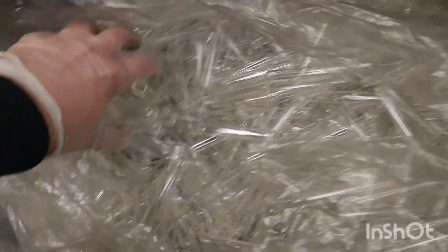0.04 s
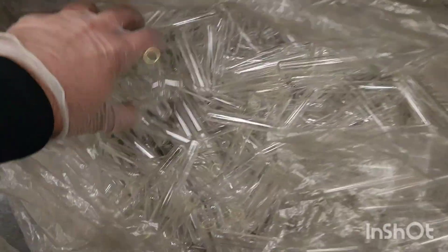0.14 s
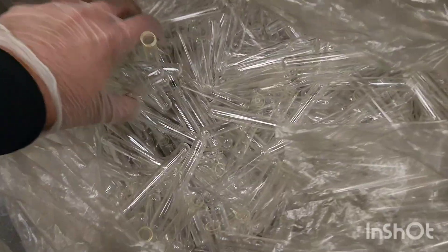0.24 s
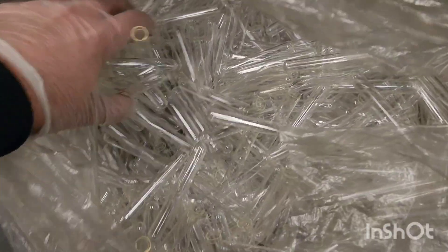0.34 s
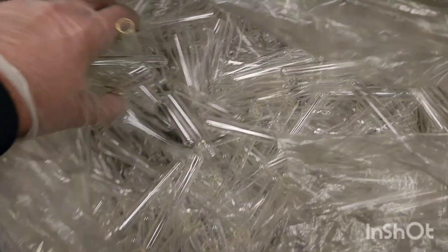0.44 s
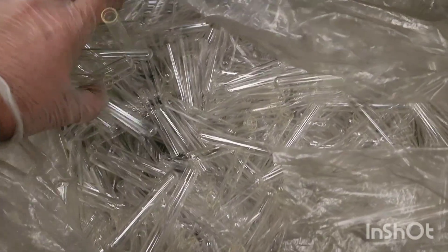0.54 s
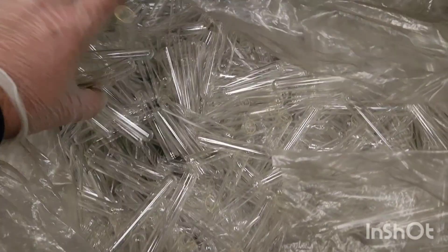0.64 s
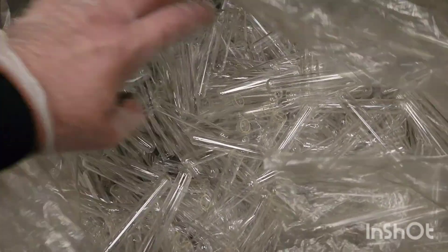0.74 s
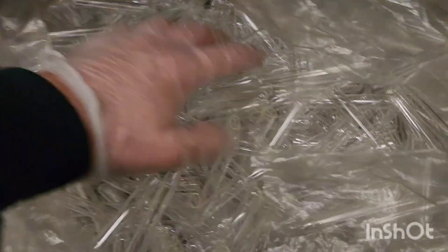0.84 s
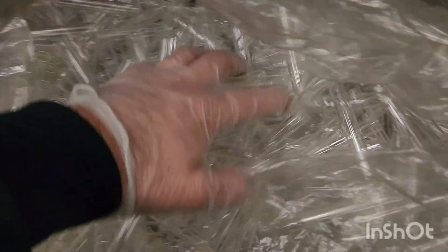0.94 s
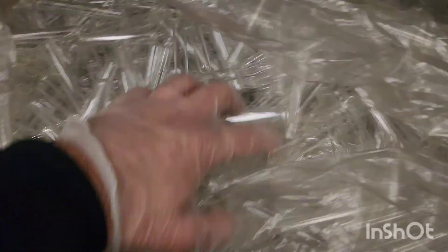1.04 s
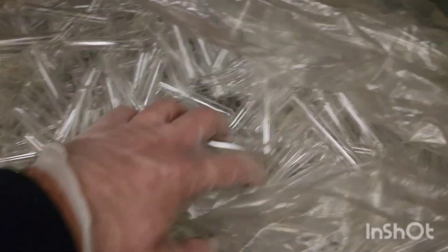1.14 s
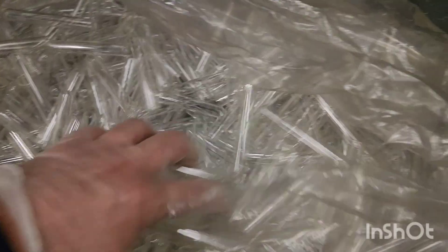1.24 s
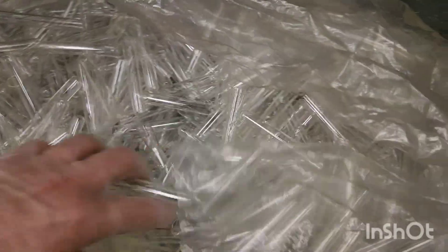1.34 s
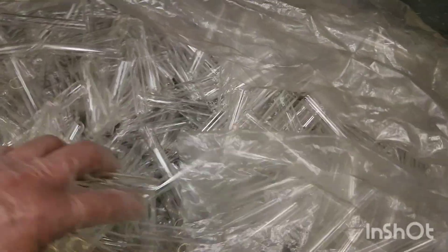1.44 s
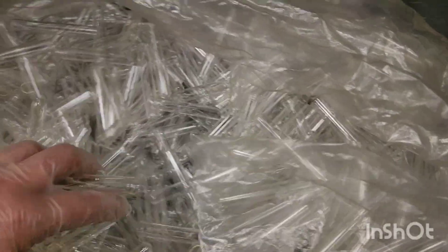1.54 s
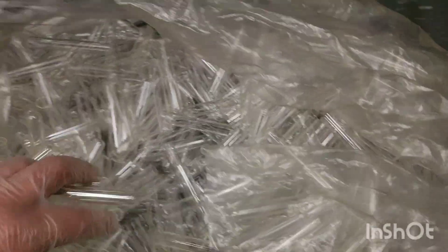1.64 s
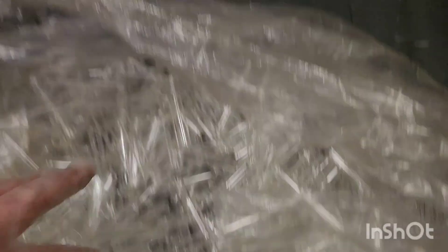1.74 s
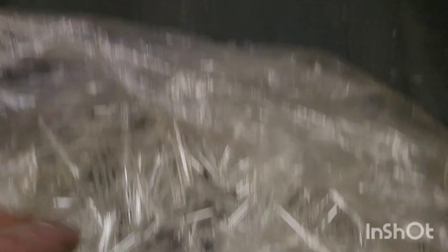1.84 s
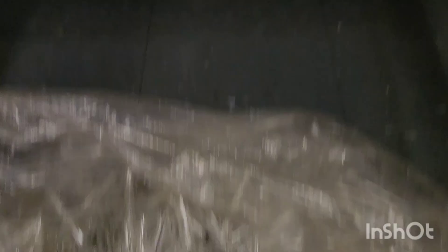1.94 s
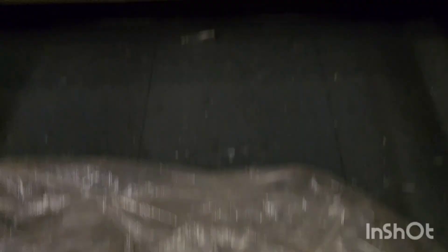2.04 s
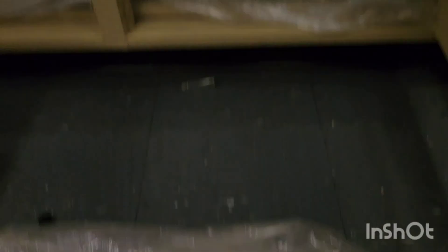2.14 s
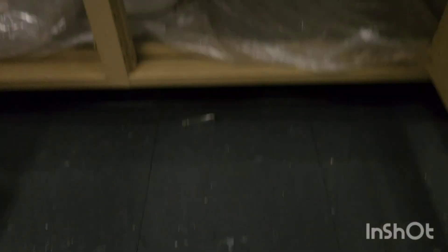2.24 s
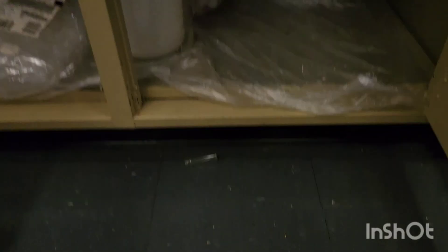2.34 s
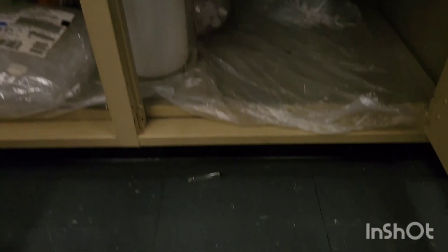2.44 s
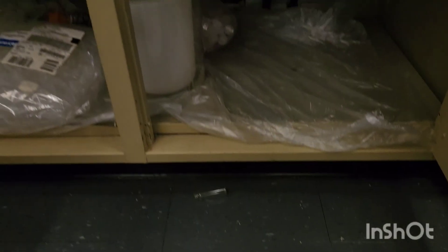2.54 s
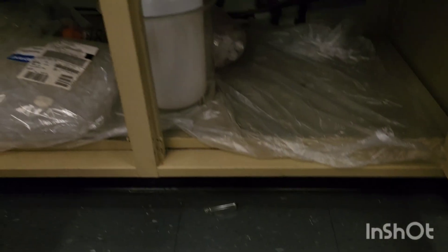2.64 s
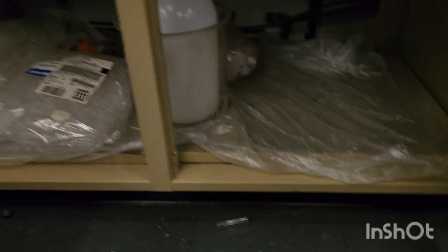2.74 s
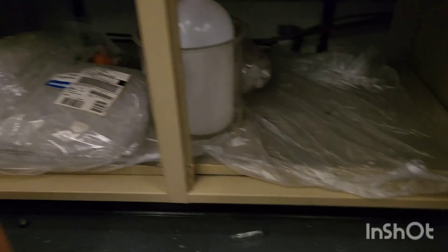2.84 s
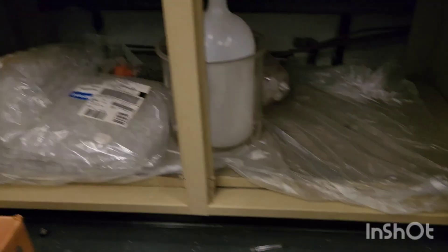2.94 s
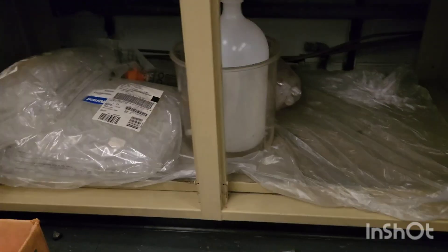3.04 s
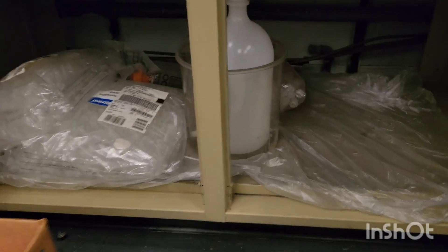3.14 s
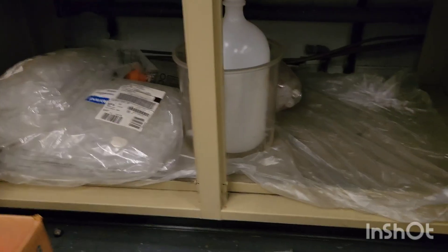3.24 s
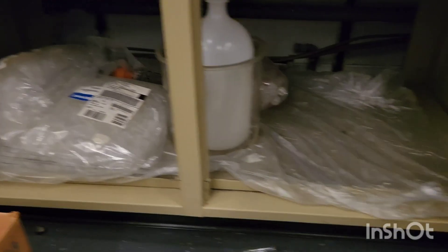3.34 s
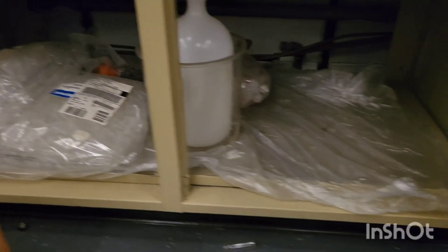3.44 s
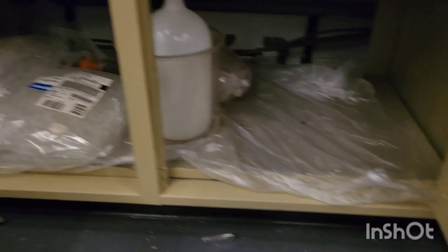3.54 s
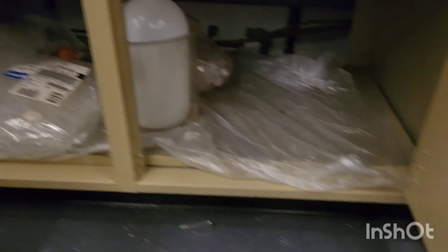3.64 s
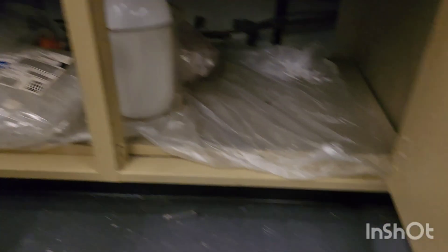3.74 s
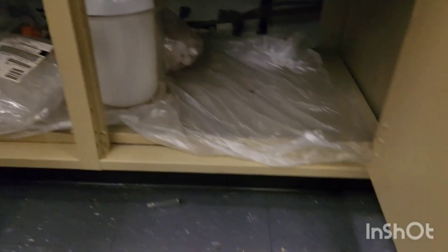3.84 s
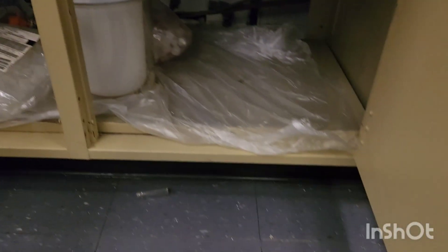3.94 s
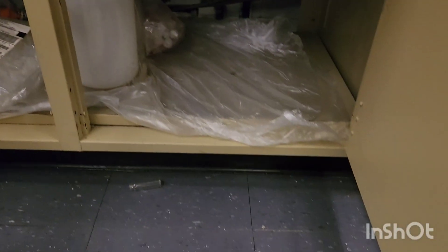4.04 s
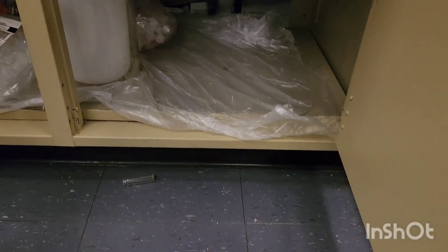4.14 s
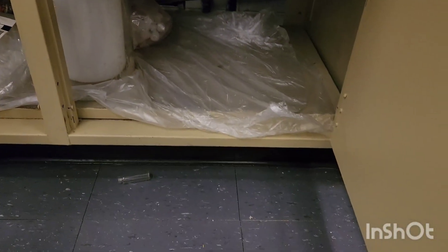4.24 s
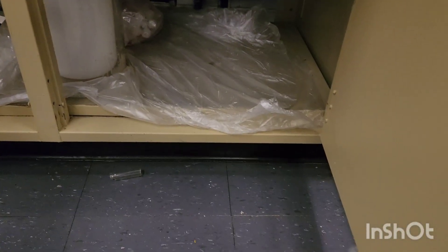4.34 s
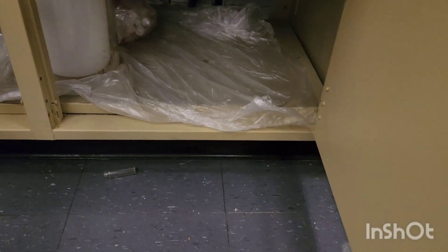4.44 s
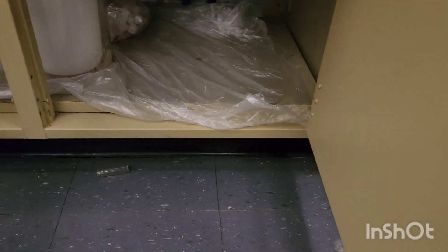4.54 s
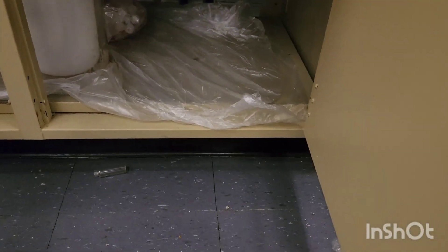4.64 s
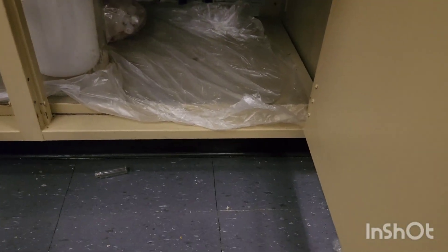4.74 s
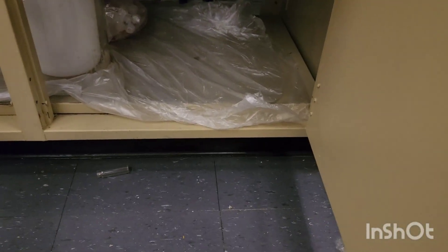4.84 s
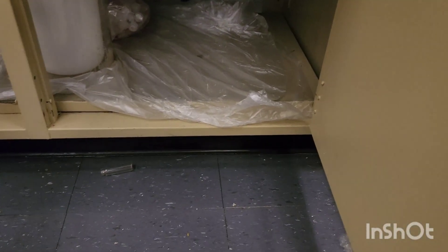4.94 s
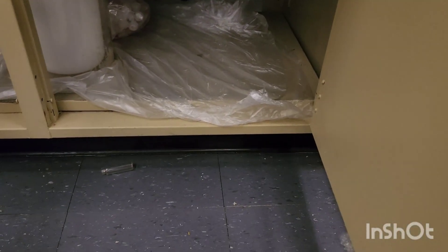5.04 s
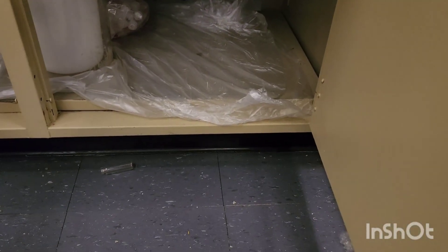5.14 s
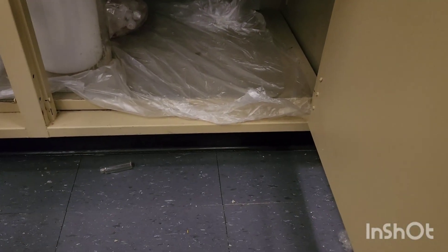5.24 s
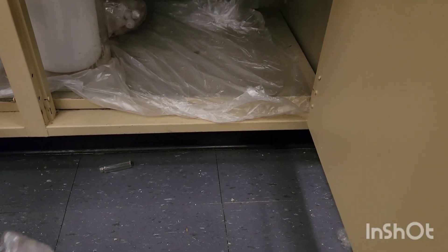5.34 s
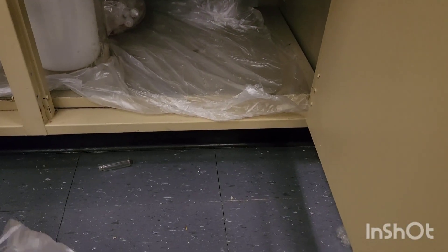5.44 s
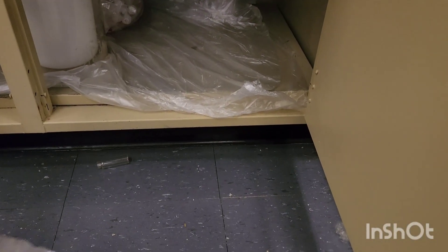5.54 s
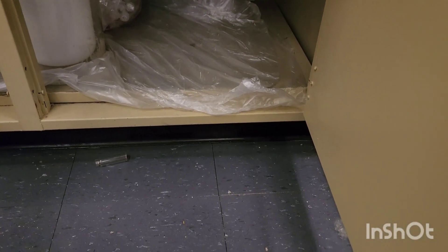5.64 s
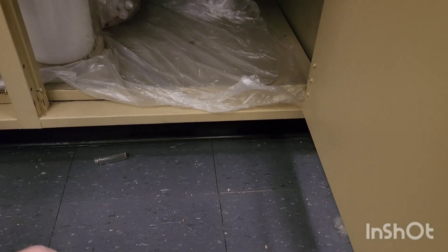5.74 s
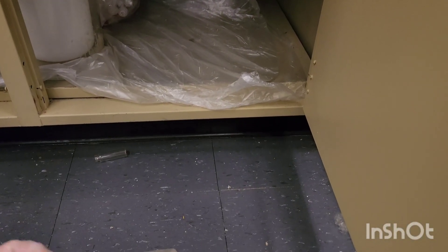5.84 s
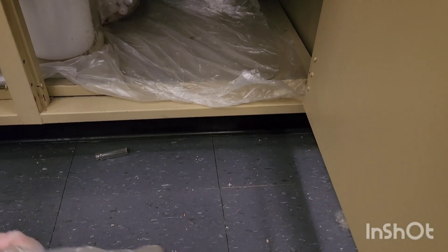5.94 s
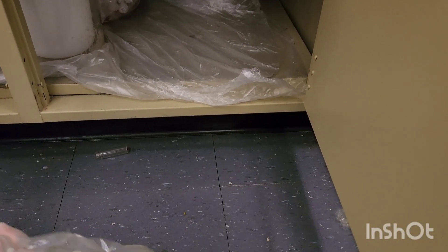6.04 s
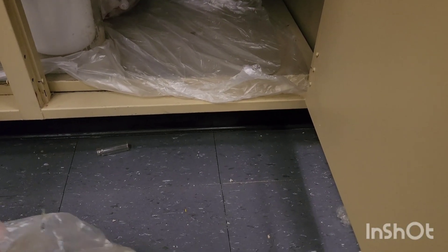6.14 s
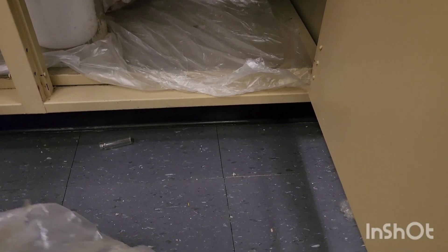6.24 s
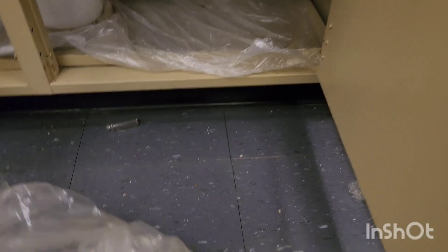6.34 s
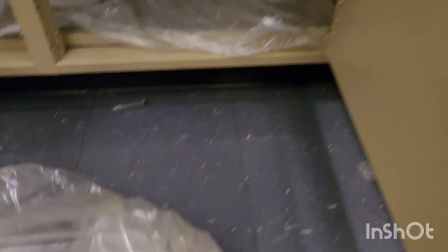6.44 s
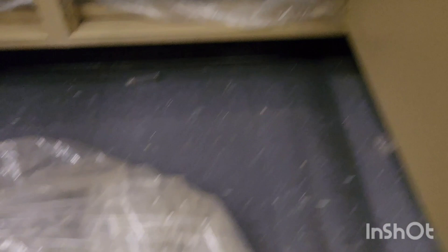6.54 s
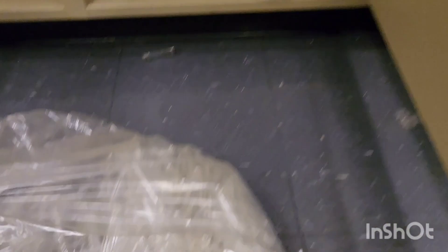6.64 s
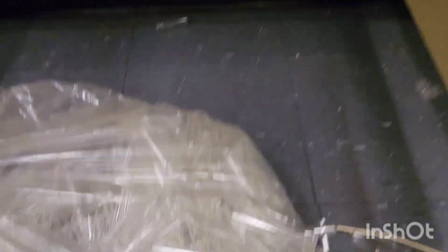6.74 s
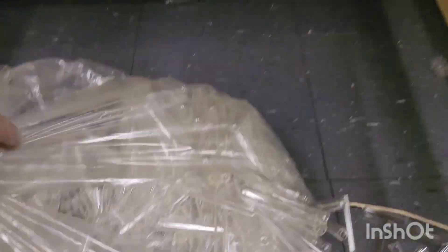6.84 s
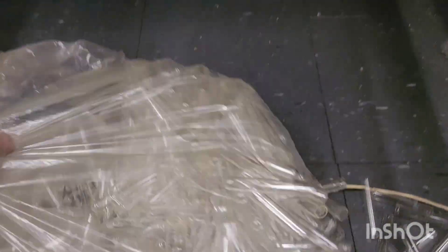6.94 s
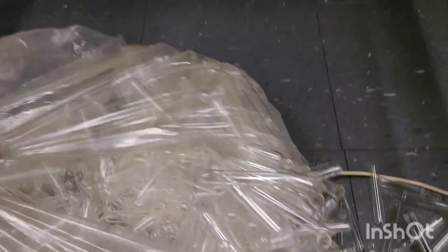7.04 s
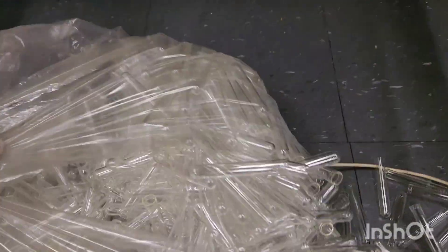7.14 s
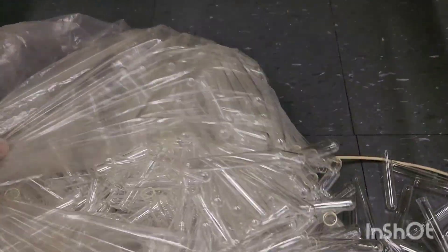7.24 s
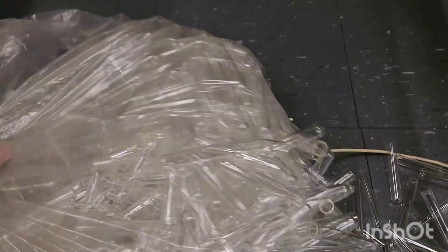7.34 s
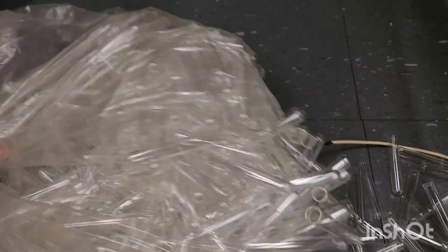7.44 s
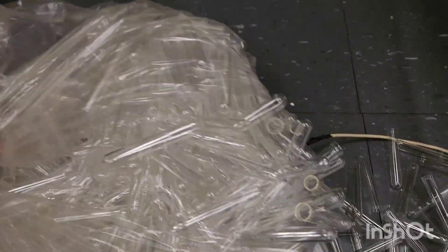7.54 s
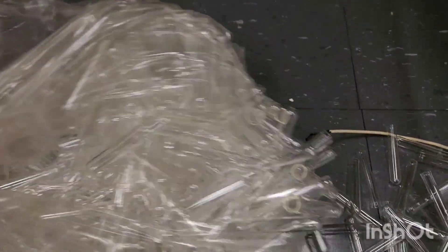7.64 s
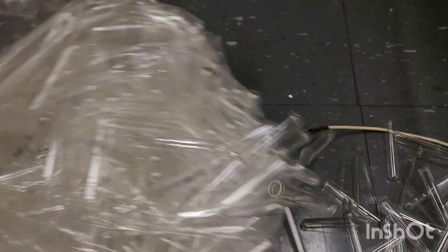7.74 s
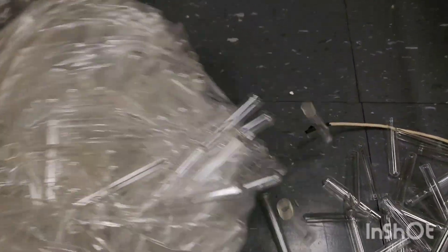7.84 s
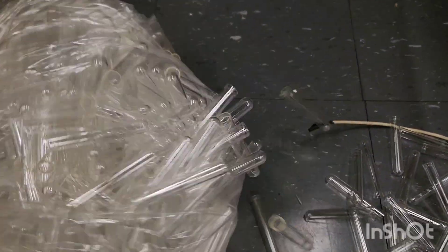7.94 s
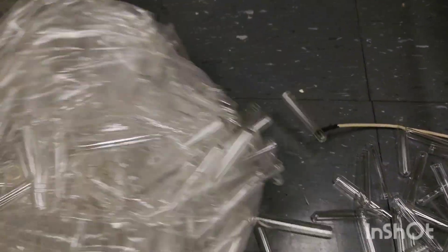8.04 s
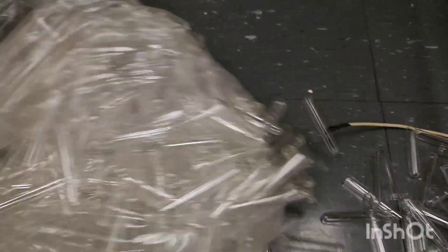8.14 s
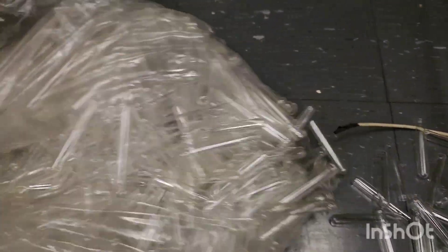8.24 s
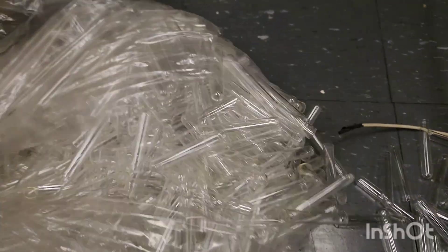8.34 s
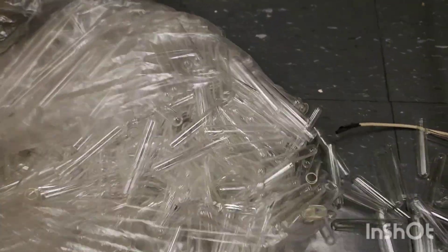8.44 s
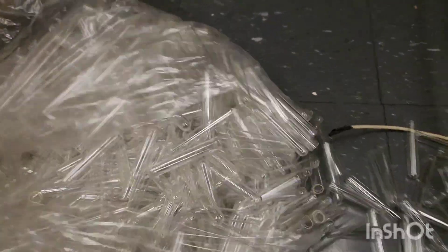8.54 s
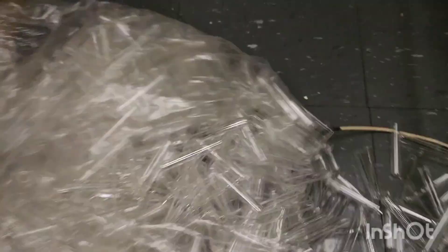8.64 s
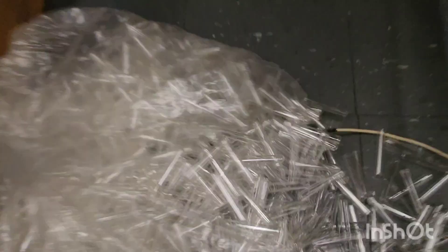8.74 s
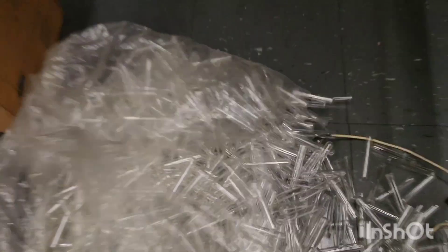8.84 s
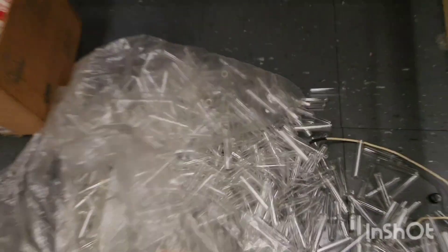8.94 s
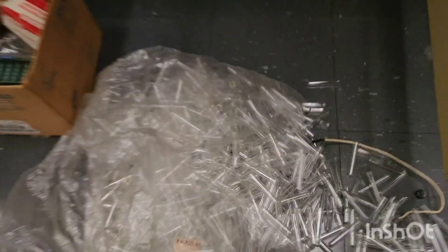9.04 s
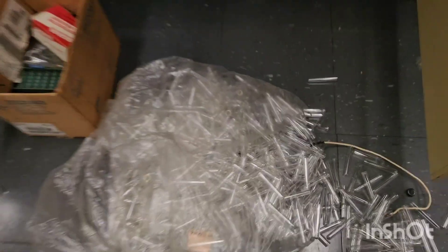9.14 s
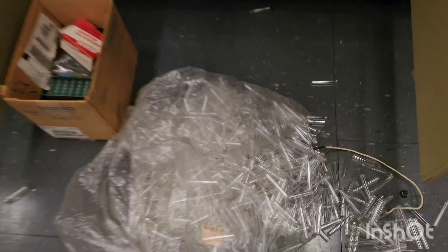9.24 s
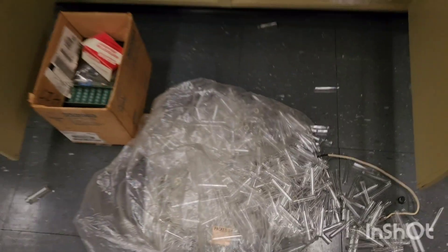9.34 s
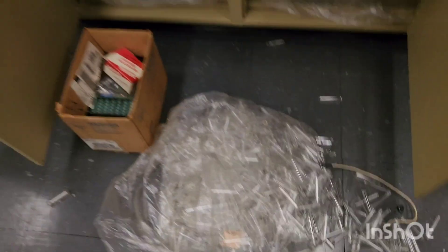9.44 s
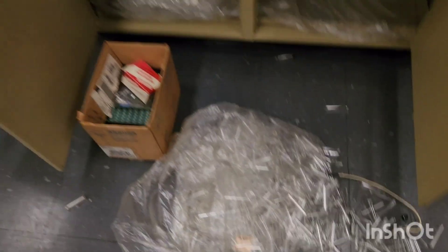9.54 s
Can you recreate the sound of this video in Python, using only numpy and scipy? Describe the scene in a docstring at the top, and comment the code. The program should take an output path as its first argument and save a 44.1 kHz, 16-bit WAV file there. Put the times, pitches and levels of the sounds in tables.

```python
"""In a small room, a hand stirs glass test tubes in a plastic bag, rests, then drags the bag over the floor.
Each impact excites a tube's damped normal modes; all are of one size, so they ring near the same pitches.
The film crinkles as its creases snap, and the heavy bag rubs and bumps softly on the floor.
Fingers tick on a hand-held microphone's case, a sleeve brushes past its two ports, the building rumbles."""
import sys
import numpy as np
from scipy import signal
from scipy.fft import rfft, irfft
from scipy.io import wavfile
from scipy.ndimage import uniform_filter1d

SR = 44100
rng = np.random.default_rng(int(sys.argv[2]) if len(sys.argv) > 2 else 0)


def wav_record(signal):
    """Record a signal, one row per channel, as 16-bit PCM in the file named by sys.argv[1]."""
    frames = np.transpose(np.atleast_2d(signal))
    bounded = np.clip(frames, -1, 1)
    # unit amplitude maps onto the largest positive 16-bit level
    quanta = np.round(bounded * 32767).astype(np.int16)
    wavfile.write(sys.argv[1], SR, quanta)


N = 423360
TIME, BINS, FRAMES = np.arange(N) / SR, np.fft.rfftfreq(N, 1 / SR), np.arange(0, N / SR, .002)
OVAL_HZ, SPLIT_HZ = 4185, 6000  # a tube's strongest mode; border between its ring and its overtones
CROSSOVER = [signal.butter(4, SPLIT_HZ, kind, fs=SR, output="sos") for kind in ("low", "high")]


def amp(db):
    """Amplitude ratio of a level in decibels."""
    return 10 ** (np.asarray(db) / 20)


def unit_rms(x):
    """Normalisation to an rms of 1."""
    return x / np.sqrt(np.mean(x ** 2) + 1e-20)


def curve_at(points, hz):
    """Interpolation on a logarithmic frequency axis."""
    f, value = np.transpose(points)
    return np.interp(np.log(hz + 1), np.log(f + 1), value)


def add(mix, s, sound):
    """Superposition of a stereo sound on the mix from time s."""
    part = mix[:, max(round(s * SR), 0):][:, :sound.shape[1]]
    part += sound[:, :part.shape[1]]


def panned(db):
    """Constant-power gains for a left-minus-right level difference."""
    pair = amp(np.array([db, -db]) / 2)
    return (pair / np.sqrt(np.mean(pair ** 2, 0))).reshape(2, -1)


def colour(x, spectrum, size=1024):
    """Minimum-phase filtering: clicks take on the spectrum and keep a sharp front."""
    log_gain = np.log(amp(curve_at(spectrum, abs(np.fft.fftfreq(size, 1 / SR)))))
    taps = np.fft.ifft(np.exp(np.conj(signal.hilbert(log_gain)))).real
    return signal.oaconvolve(x, taps[None, :size // 2], axes=1)[:, :x.shape[1]]


def push_power(start, hold, swell_s, slump_db_per_s=137.5, creep_db=-16, creep_db_per_s=54.5):
    """Exponential growth (20 dB in swell_s), a hold, then two-slope decay: a quick slump, a slow creep."""
    early, late = np.maximum(start - FRAMES, 0), np.maximum(FRAMES - start - hold, 0)
    settling = amp(-slump_db_per_s * late) ** 2 + amp(creep_db - creep_db_per_s * late) ** 2
    return amp(-20 * early / swell_s) ** 2 * settling


def heap_motion(jostle_db=1.8, jostle_s=0.049):
    """Envelopes of ring, overtones and rustle: pushes add in power, and stick-slip makes all surge."""
    # stirs and tugs: t/s, hold/s, swell/s, ring level/dB, overtones re ring/dB, rustle level/dB
    pushes = [(0.0, 0.23, .05, -25.5, -7.5, -30.5), (0.373, 0.053, 0.015, -29, -5.5, -30.5),
              (0.495, 0.073, 0.087, -25, -9.5, -30), (0.722, 0.1, .12, -18.5, -8.5, -29),
              (0.909, .19, 0.033, -14.5, -4, -23.5), (1.147, 0.36, 0.041, -19.5, -3.5, -25.5),
              (1.711, .12, 0.24, -18, -9, -34.5), (2.111, 0.027, 0.025, -49, -8, -48.5),
              (2.337, 0.2, .02, -48.5, -15, -52.5), (3.714, 0.021, 0.22, -48, -2, -46),
              (3.775, .04, .035, -26.5, -8, -29.5), (3.881, .24, 0.079, -36.5, -8, -38.5),
              (4.45, 0.21, 0.25, -37.5, -1, -32.5), (4.701, 0.17, 0.042, -24.5, -10, -28),
              (4.964, 0.26, 0.056, -28, -12.5, -31.5), (5.196, 0.33, .04, -21, -15.5, -26.5),
              (5.501, .23, 0.074, -21, -8.5, -26.5), (5.776, 0.21, .06, -16, -10, -25),
              (6.006, 0.17, 0.04, -16, -8.5, -30), (6.194, 0.24, 0.03, -21, -5.5, -29),
              (6.447, .17, 0.025, -22.5, -6, -27.5), (6.679, .1, .05, -29, -3.5, -32),
              (6.85, 0.31, 0.38, -18.5, -14, -25), (7.299, 0.13, 0.16, -21, -17.5, -26.5),
              (7.503, .08, .05, -30, -7.5, -33.5), (7.677, 0.32, 0.12, -22.5, -11, -27),
              (8.026, 0.17, .05, -19, -7.5, -26), (8.239, 0.054, .03, -18.5, -12, -51),
              (8.384, 0.17, 0.064, -23, -10, -42), (8.588, 0.15, 0.16, -16, -9, -31),
              (8.807, 0.17, 0.081, -22.5, -8.5, -40), (9.098, 0.035, 0.15, -27.5, -11, -47.5)]
    power = amp([-69, -68, -67.5])[:, None] ** 2  # the heap at rest
    for start, hold, swell_s, ring_db, overtones_db, rustle_db in pushes:
        strength = amp([[ring_db], [ring_db + overtones_db], [rustle_db]])
        power = power + strength ** 2 * push_power(start, hold, swell_s)
    span = int(jostle_s * SR)
    jostle = uniform_filter1d(uniform_filter1d(rng.standard_normal(N), span), span // 2)
    surge = amp(jostle_db * unit_rms(jostle))
    return [surge * np.interp(TIME, FRAMES, np.sqrt(layer)) for layer in power]


def follow(x, envelope, span_s=0.017):
    """Amplitude modulation: a texture is levelled by its short-time power, then takes the envelope."""
    power = uniform_filter1d(x.mean(0) ** 2, int(span_s * SR))
    power = abs(uniform_filter1d(power, int(span_s * SR / 2)))
    return x / np.sqrt(power + 0.04 * power.mean()) * envelope


def building_rumble(level_db=-50, wide_hz=500):
    """Steady noise whose long waves are coherent at the two ports."""
    # rumble spectrum: f/Hz, relative level/dB
    spectrum = [(12, -43.5), (20, -6.5), (40, 3), (68, 2), (142, -8), (248, -17.5), (558, -18.5),
                (678, -20), (2670, -24.5), (4300, -23.5), (6720, -35), (10800, -46), (12100, -39),
                (16000, -44.5)]
    common, apart = rfft(rng.standard_normal((2, N)))
    side = apart * np.sqrt(BINS / (BINS + wide_hz)) * 0.65
    noise = irfft(np.array([common + side, common - side]) * amp(curve_at(spectrum, BINS)), N)
    return amp(level_db) * unit_rms(noise) * panned(-1.8)


def reflections(x, room_db=-23, heap_db=-12, heap_t60=0.035, shift_hz=6, path_sets=5):
    """Room reverberation, and scattering inside the heap along paths that change as the tubes shift."""
    # reverberation time of the room: f/Hz, T60/s
    decay_times = [(200, 0.3), (1500, 1), (4200, 0.17), (9000, 0.087), (16000, 0.45)]
    t = np.arange(SR // 2) / SR
    shape = (path_sets + 1, 2, len(t))
    echoes = rng.standard_normal(shape) * (rng.random(shape) < .08)
    hz, age, spectra = signal.stft(echoes[-1] * (t > .008), SR, nperseg=256)
    decay = amp(-60 * age / curve_at(decay_times, hz)[:, None])
    tail = signal.istft(spectra * decay, SR, nperseg=256)[1][:, :len(t)]
    out = x + signal.oaconvolve(x, amp(room_db) * tail / np.linalg.norm(tail[0]), axes=1)[:, :N]
    for k in range(path_sets):
        paths = (echoes[k] * amp(-60 * t / heap_t60) * (t > .001))[:, :SR // 10]
        paths = amp(heap_db) * paths / np.linalg.norm(paths[0])
        crossfade = np.sqrt(np.maximum(1 - abs((TIME * shift_hz - k) % path_sets - 1), 0))
        out += signal.oaconvolve(x * crossfade, paths, axes=1)[:, :N]
    return out


def microphone_ports(x, alike_hz=800):
    """Long waves reach both ports alike; each port then has its own frequency response."""
    # balance of the bag's sound: f/Hz, left-minus-right level/dB
    balance = [(100, -3), (600, 2), (1100, -4), (2200, -8.5), (4200, -12.5), (5000, -10.5), (5900, 2.5),
               (6800, 11), (8500, 14), (10000, 4.5), (11800, 8), (12800, -25), (15000, 3)]
    spectra = rfft(x)
    leak = np.pi / 4 * alike_hz ** 2 / (BINS ** 2 + alike_hz ** 2)
    blended = spectra * np.cos(leak) + spectra[::-1] * np.sin(leak)
    return irfft(blended * panned(curve_at(balance, BINS)), N)


def floor_bumps(gain_db=-1, decay_s=0.013, rise_s=0.0035, size=6000):
    """Soft impacts of the heap on the floor: a heavily damped low oscillation with a little scuff."""
    # bumps: t/s, relative peak level/dB, f/Hz
    bumps = [(3.779, -35, 72.7), (4.066, -43, 102), (4.188, -40, 140), (4.243, -34.5, 101),
             (4.577, -32, 99), (6.424, -29, 110.5), (6.456, -32, 92), (8.528, -29, 81.5), (8.548, -32, 77)]
    out, t = np.zeros((2, N)), np.arange(size) / SR
    band = signal.butter(2, [120, 800], "band", fs=SR, output="sos")
    for s, db, hz in bumps:
        scuff = unit_rms(signal.sosfilt(band, rng.standard_normal(size)))
        envelope = np.exp(-t / decay_s) * (1 - np.exp(-t / rise_s))
        thud = (2 * np.sin(2 * np.pi * hz * t) + scuff / 2) * envelope
        add(out, s, amp(db + gain_db) * thud / abs(thud).max() * panned(-6))
    return out


def finger_ticks(gain_db=3, decay_s=0.00022, skin=0.064, skin_s=0.0076, size=1500):
    """Impacts on the case by the right port: a click damped within a cycle, and brief skin friction."""
    # ticks: t/s, relative peak level/dB, f/Hz
    ticks = [(2.201, -38, 400), (2.68, -38, 600), (2.73, -41, 810), (2.908, -31, 670), (2.927, -27.5, 400),
             (2.958, -36, 1400), (2.964, -25, 1390), (2.992, -31, 400), (3.085, -29, 1400),
             (3.164, -28, 560), (3.588, -28.5, 700), (3.62, -22.5, 670), (3.767, -9, 1380),
             (4.197, -17.5, 1420), (4.25, -21, 850), (4.578, -14, 600), (4.927, -15.5, 1200),
             (6.469, -16, 600), (8.553, -13.5, 890), (9.375, -42, 890)]
    out, t = np.zeros((2, N)), np.arange(size) / SR
    band = signal.butter(2, [250, 3600], "band", fs=SR, output="sos")
    for s, db, hz in ticks:
        rub = unit_rms(signal.lfilter([1], [1, -.88], rng.standard_normal(size)))
        click = np.cos(2 * np.pi * hz * t) * np.exp(-t / decay_s)
        tick = signal.sosfilt(band, click + skin * rub * np.exp(-t / skin_s))
        add(out, s, amp(db + gain_db) * tick / abs(tick).max() * panned(-17))
    return out


def sleeve_swishes(grain_db=3):
    """Grainy friction noise of cloth passing the right port as the grip changes."""
    # swishes: t/s, duration/s, level/dB
    brushes = [(2.897, 0.12, -42.5), (3.03, 0.087, -53.5), (3.153, .03, -41), (3.189, 0.057, -45.5),
               (3.297, 0.54, -61), (4.363, .3, -43.5)]
    spectrum = [(60, 16), (300, 9.5), (1200, -4), (4500, 1.5), (7000, -0.5), (10000, -10),
                (13000, -2), (16000, -21)]  # f/Hz, relative level/dB
    out = np.zeros((2, N))
    fibres = rng.standard_normal((2, N)) * amp(grain_db * np.minimum(rng.exponential(1, N), 5))
    cloth = unit_rms(colour(fibres, spectrum))
    for s, duration, db in brushes:
        swell = signal.windows.tukey(int(duration * SR), .7)
        add(out, s, amp(db) * swell * cloth[:, int(s * SR):][:, :len(swell)] * panned(-4.2))
    return out


def bag_friction(rustle, lumpy_db=3, swell_s=0.18, rub_db=-28.5):
    """Dull, uneven friction noise whenever the heavy bag moves, stronger when it slides on the floor."""
    # slides: t/s, hold/s, level/dB
    scrapes = [(0.0, 0.44, -51), (0.464, 0.13, -46), (3.777, 0.038, -44.5), (3.933, 0.15, -50),
               (4.44, 0.14, -43.5), (7.0, .14, -49), (7.278, 0.23, -48), (7.672, 0.22, -45),
               (9.19, 0.022, -56)]
    spectrum = [(40, -35.5), (110, 2.5), (190, -1.5), (300, -5), (450, -5.5), (650, 1.5),
                (1200, -22), (4000, -47)]  # f/Hz, relative level/dB
    common, apart, lumps = rng.standard_normal((3, N))
    rub = colour(np.array([common + apart / 2, common - apart / 2]), spectrum)
    rub = unit_rms(rub * amp(lumpy_db * unit_rms(uniform_filter1d(lumps, 900))))
    sliding = sum(amp(db) ** 2 * push_power(start, hold, swell_s) for start, hold, db in scrapes)
    power = np.interp(TIME, FRAMES, sliding) + (amp(rub_db) * rustle) ** 2
    return rub * np.sqrt(power) * panned(-1)


def film_crinkle(rustle, snaps_per_s=2200, spread_db=-0.5, hiss=0.18, shared=0.64):
    """Shot noise of creases snapping, swelling in clumps, over the hiss of sliding glass and plastic."""
    # spectrum of the film: f/Hz, relative level/dB
    spectrum = [(80, -18), (330, -18.5), (700, -11), (1080, -1.5), (1350, -7.5), (2200, 1), (3000, 2.5),
                (3330, 0), (3800, 0), (4700, 5), (5800, -12), (7800, -14), (11000, -27), (16000, -17.5)]
    snapping = rng.random((3, N)) < snaps_per_s / SR
    snaps = snapping * amp(spread_db * np.minimum(rng.exponential(1, (3, N)), 5))
    drive = (snaps + hiss) * rng.standard_normal((3, N))  # left, right, common to both
    clumps = amp(2.0 * unit_rms(uniform_filter1d(rng.standard_normal(N), 500)))
    return follow(colour((drive[:2] + shared * drive[2]) * clumps, spectrum), rustle)


def tube_clonks(gain_db=6, t60=0.045, size=4000):
    """Tubes knocked across their length sound the bending mode, a short hollow note."""
    # knocks: t/s, relative peak level/dB, f/Hz
    clonks = [(6.623, -30.5, 1080), (7.644, -29, 1150), (7.8384, -30, 1210), (7.9384, -29.5, 1140),
              (8.0423, -37, 1090), (8.5728, -35, 1150)]
    out, t = np.zeros((2, N)), np.arange(size) / SR
    for s, db, hz in clonks:
        add(out, s, amp(db + gain_db - 60 * t / t60) * np.sin(2 * np.pi * hz * t) * panned(0))
    return out


def collision(hz, pinch_db, strike_db=3, mismatch=0.0092, damping=0.14, size=3600):
    """Modal response to one blow, as (lows, highs). Pinching damps the oval mode and adds knock."""
    # tube modes, the strongest squeezing the wall to an oval: f/Hz, relative level/dB, T60/s
    tube_modes = [(1080, -21, 0.092), (3034, -38, .015), (4184, 7, 0.071), (4220, -3, 0.018),
                  (4360, -8, .011), (7083, -14.5, 0.067), (8760, -14, 0.086), (9664, -8.5, 0.078),
                  (10240, -11, 0.058), (11970, -4, 0.056), (12960, -9, .05), (15300, -1.5, 0.047),
                  (16200, -7, 0.038)]
    # spectrum of the contact noise: f/Hz, relative level/dB
    contact = [(100, -21.5), (500, -21.5), (1000, -3), (2500, 0.5), (3350, 2), (4600, 13.5), (6000, -12.5),
               (8000, -6.5), (10500, -6), (12500, -5.5), (13800, -38), (16000, 1.5)]
    rise_s, contact_s, contact_db = 0.00078, 0.0054, -5
    t = np.arange(size) / SR
    f, db, t60 = np.transpose(tube_modes)
    detune, weight = rng.standard_normal((2, len(f)))
    oval = db == db.max()
    t60 = t60 * amp(-damping * pinch_db * oval)
    pitch = np.where(oval, hz, f * (1 + mismatch * detune))  # no two tubes are quite alike
    height = amp(db + strike_db * weight * ~oval)  # the striking point weights the modes
    phase = 2 * np.pi * (pitch[:, None] * t + rng.random((2, len(f), 1)))
    modes = np.sin(phase) * height[:, None] * amp(-60 * t / t60[:, None])
    ring = modes.sum(1) * (1 - np.exp(-t / rise_s))  # builds up while the contact chatters
    chatter = unit_rms(colour(rng.standard_normal((2, size)), contact))
    crack = 4 * amp(contact_db) * chatter * np.exp(-t / contact_s)
    fade = np.minimum((size - np.arange(size)) / (size / 2), 1)
    low = signal.sosfilt(CROSSOVER[0], fade * (ring + amp(pinch_db) * crack))
    high = signal.sosfilt(CROSSOVER[1], fade * (ring + crack))
    return np.array([low, high])


def tube_rattle(ringing, overtones, rustle, hits_per_s=480, spread_db=3, pinch_db=9, count=150):
    """Impacts as a Poisson process: pressed tubes knock, some raised in pitch; free ones ring alike."""
    freedom = np.linspace(0, 1, count)
    raised = (rng.random(count) < 1.3 * (1 - freedom) ** 2) * rng.exponential(1, count)
    pitches = OVAL_HZ * (1 + .032 * raised + 0.0079 * (rng.standard_normal(count) - .5))
    tubes = [collision(hz, pinch_db * (1 - 2 * free)) * panned(3 * rng.standard_normal())
             for hz, free in zip(pitches, freedom)]
    spill = 20 * np.log10(ringing / rustle) / 14  # the more ring over rustle, the freer the tubes
    which = (np.clip(spill, 0, .5) + rng.random(N) / 2) * (count - 1)
    low, high = np.zeros((2, 2, N))
    chance, force = rng.random(N), rng.exponential(1, N)
    for at in np.flatnonzero(chance < hits_per_s / SR):
        hit_low, hit_high = amp(spread_db * min(force[at], 3)) * tubes[int(which[at])]
        add(low, at / SR, hit_low)
        add(high, at / SR, hit_high)
    return amp(-4) * follow(low, ringing) + amp(-0.57) * follow(high, overtones)


def tube_clinks(gain_db=0.97, treble_db=6, free_db=-30.5, rebound_db=-8, rebound_s=0.0088):
    """Impact and rebound: a tube drops on a neighbour and, the more pinched, the harder hits a second."""
    # prominent collisions: t/s, relative ring level/dB, f/Hz, relative overtone level/dB
    clinks = [(0.04, -21, 4300, -8), (.127, -13, 4190, -12.5), (.277, -32, 4260, -13),
              (0.316, -26, 4210, -14), (0.357, -22, 4370, -18), (.379, -18.5, 4140, -5.5),
              (.458, -24, 4220, -5), (.517, -16.5, 4290, -9.5), (0.538, -17, 4170, -10),
              (0.559, -15.5, 4260, -11.5), (0.665, -21.5, 4330, -23.5), (0.799, -14, 4244, -12),
              (1.077, -15, 4190, -22.5), (1.162, -16, 4220, -19), (1.306, -13.5, 4305, -8),
              (1.592, -22.5, 4160, -11), (1.681, -20, 4185, -6), (1.908, -23.5, 4160, -6.5),
              (1.972, -23.5, 4220, -15), (2.013, -30, 4120, -10), (2.113, -36, 4160, 0),
              (2.262, -53, 4300, -4), (2.34, -34, 4320, -11), (2.377, -33.5, 4340, -9),
              (2.421, -39, 4300, -6), (2.467, -42, 4230, -9), (2.482, -36.5, 4280, -11),
              (2.518, -38, 4360, -14), (2.562, -33.5, 4220, -13.5), (2.757, -50, 4300, -11),
              (2.849, -43.5, 4270, -12.5), (3.34, -44.5, 4290, -14), (3.435, -49, 4300, -17),
              (3.759, -19.5, 4160, -25), (3.811, -20.5, 4270, -15), (3.876, -20.5, 4220, -19),
              (3.974, -25.5, 4170, -21), (4.042, -36, 4330, -28), (4.086, -24, 4190, -20),
              (4.111, -23.5, 4300, -27), (4.508, -26, 4200, -16), (4.673, -23, 4250, -32),
              (4.902, -21, 4160, -12), (5.009, -16.5, 4190, -32), (5.324, -21, 4340, -23),
              (5.478, -13, 4200, -19), (5.527, -13, 4200, -18.5), (6.021, -14, 4110, -32),
              (6.23, -13, 4180, -14), (6.309, -12, 4100, -16), (6.517, -17.5, 4190, -22),
              (6.791, -11, 4250, -24), (6.94, -18.5, 4310, -10), (7.407, -23.5, 4140, -7),
              (7.424, -7.5, 4160, -31), (7.506, -18, 4180, -34), (7.644, -22.5, 4210, -14),
              (7.739, -13.5, 4100, -65), (7.873, -15.5, 4220, -22), (8.095, -23, 4240, -25),
              (8.213, -11.5, 4180, -20), (8.389, -19.5, 4190, -12), (8.459, -27, 4150, 2),
              (8.517, -25, 4140, -3.5), (8.613, -18, 4220, -28), (8.948, -28, 4130, -32),
              (9.141, -50, 4000, -28), (9.169, -32, 4200, -33), (9.25, -37, 4220, -23),
              (9.37, -49, 4260, -27), (9.543, -52.5, 4350, -26.5)]
    out, attack = np.zeros((2, N)), SR // 100
    for s, db, hz, overtones_db in clinks:
        pinch_db = min(0.5 * (free_db - db), 1)  # only a loose tube can ring loudly
        first = collision(hz, pinch_db, strike_db=3.5)
        second = collision(OVAL_HZ * rng.uniform(1.0, 1.04), pinch_db)
        delay = int(rebound_s * rng.uniform(.4, 1.4) * SR)
        rebound = amp(rebound_db + pinch_db / 2) * np.pad(second, ((0, 0), (0, 0), (delay, 0)))
        low, high = np.pad(first, ((0, 0), (0, 0), (0, delay))) + rebound
        ring = low / np.std(low[:, :attack])
        overtones = amp(overtones_db + treble_db) * high / np.std(high[:, :attack])
        add(out, s, amp(db + gain_db) * (ring + overtones))
    return out


def scene():
    """Superposition of glass and film in the room with friction, handling and rumble."""
    ringing, overtones, rustle = heap_motion()
    glass = tube_rattle(ringing, overtones, rustle) + tube_clinks() + tube_clonks()
    heap = microphone_ports(reflections(glass + film_crinkle(rustle)))
    handling = bag_friction(rustle) + sleeve_swishes() + finger_ticks() + floor_bumps()
    return heap + handling + building_rumble()


def record(dry, ceiling=0.86, edge_hz=15900):
    """Soft saturation just under full scale, then a low-pass band limit."""
    lowpass = signal.firwin(601, edge_hz, window=("kaiser", 8), fs=SR)
    limited = dry / (1 + (dry / ceiling) ** 6) ** (1 / 6)
    return signal.oaconvolve(limited, lowpass[None], "same")


dry = scene()
out = record(dry)
wav_record(out)
```